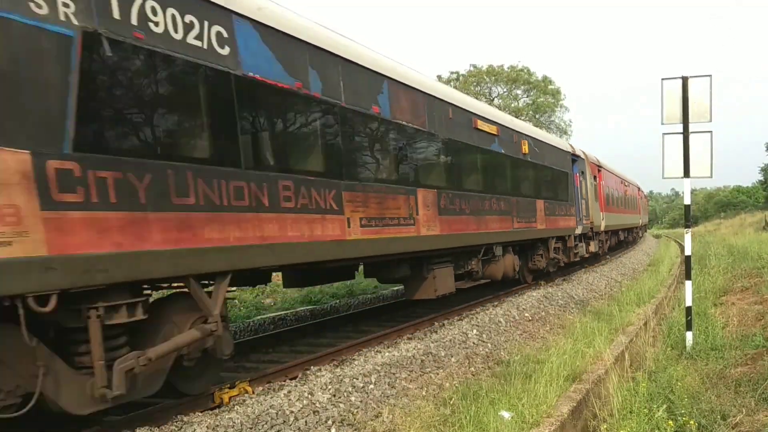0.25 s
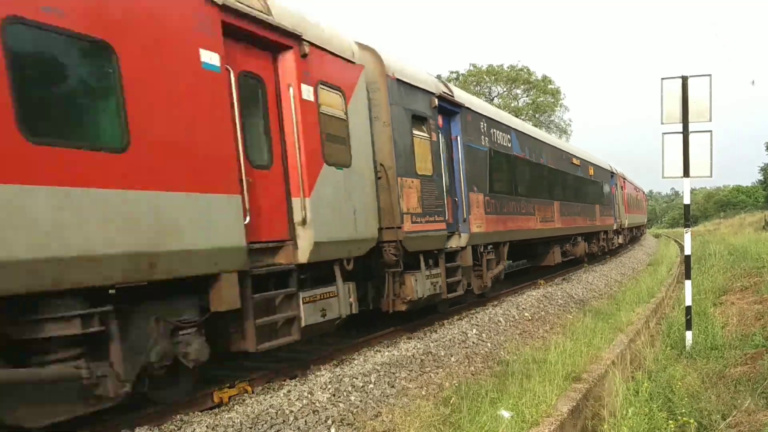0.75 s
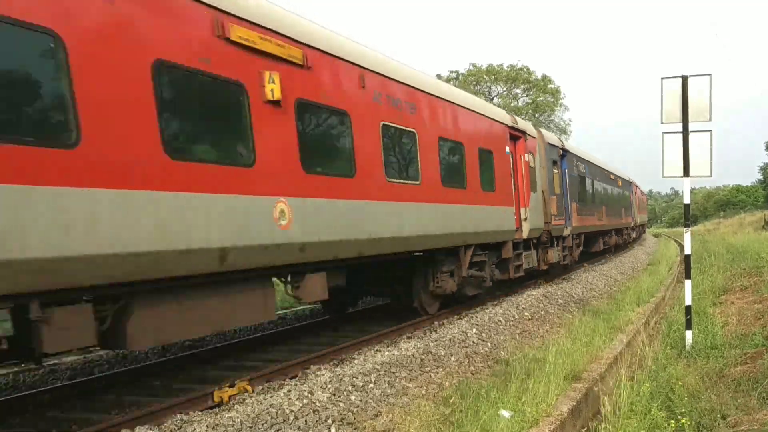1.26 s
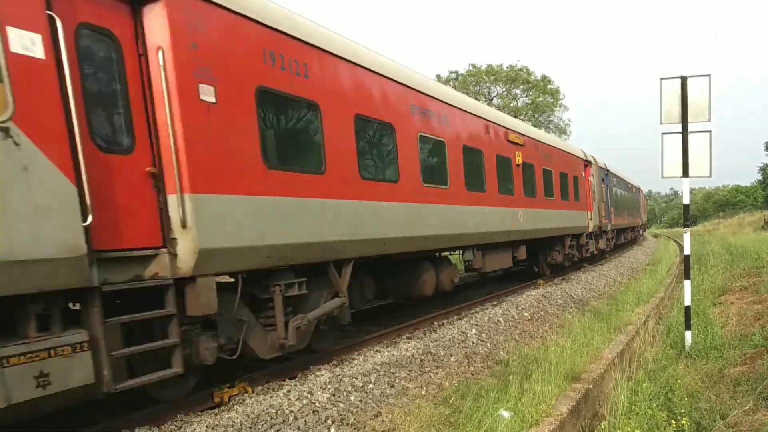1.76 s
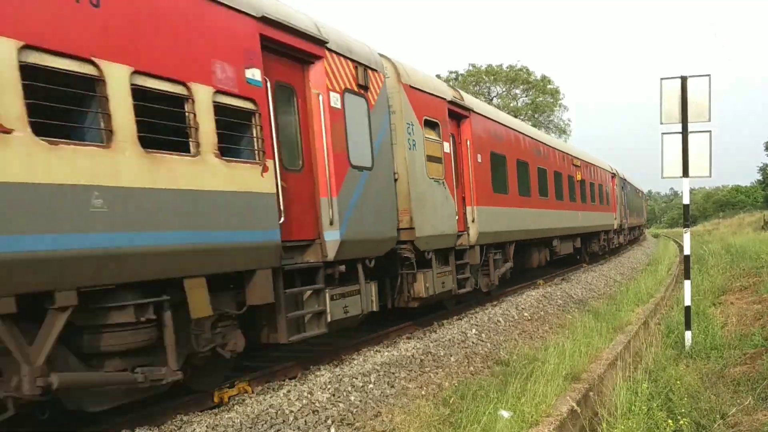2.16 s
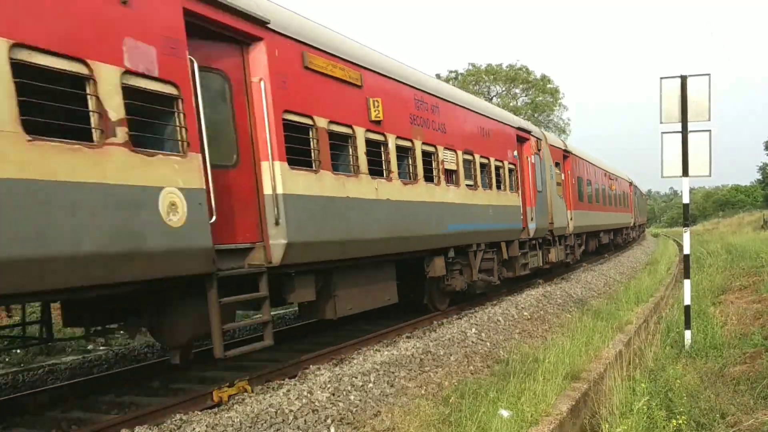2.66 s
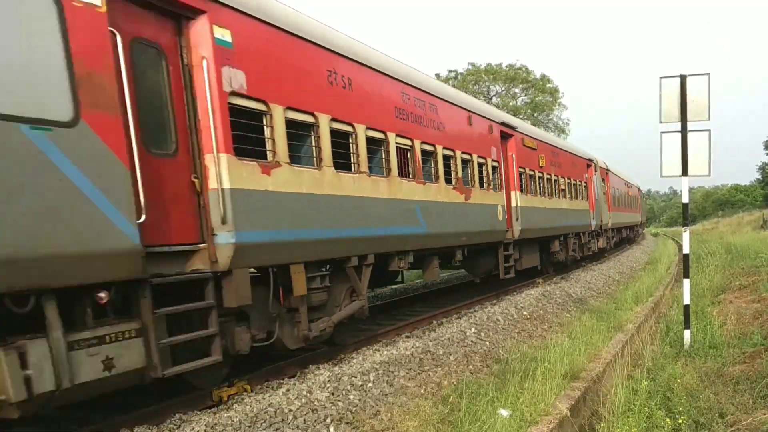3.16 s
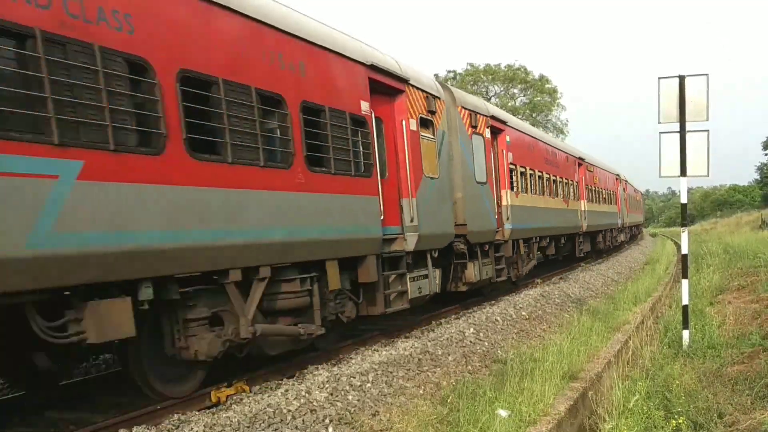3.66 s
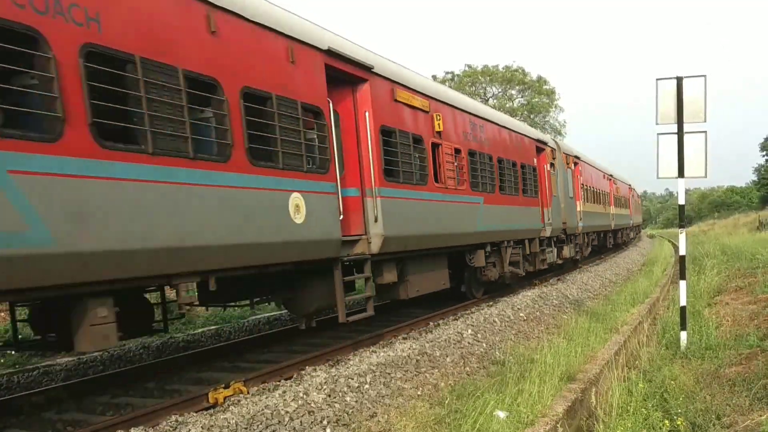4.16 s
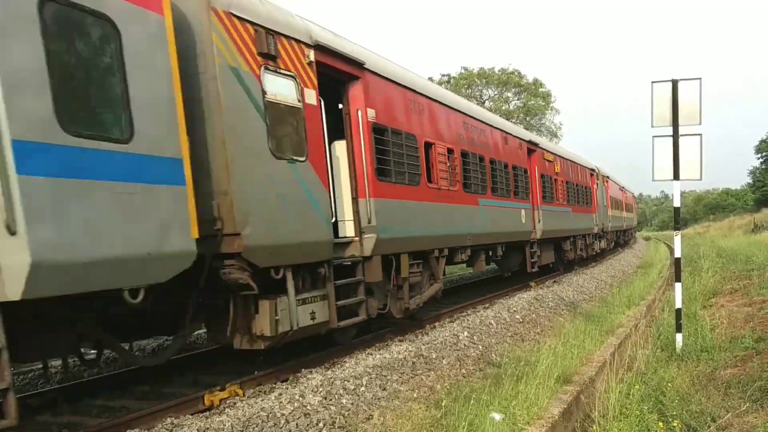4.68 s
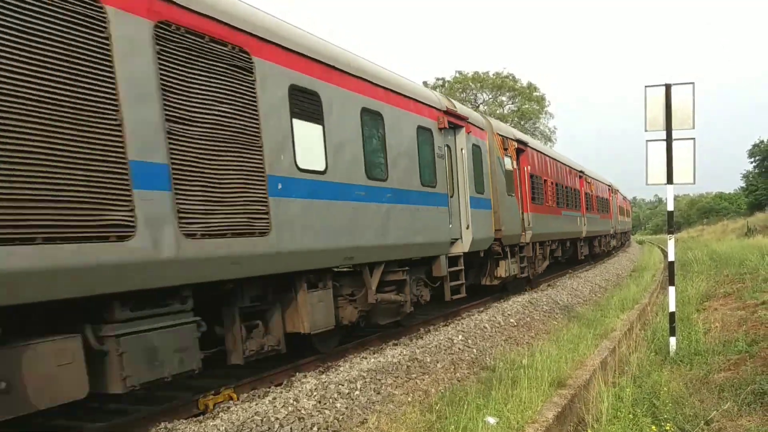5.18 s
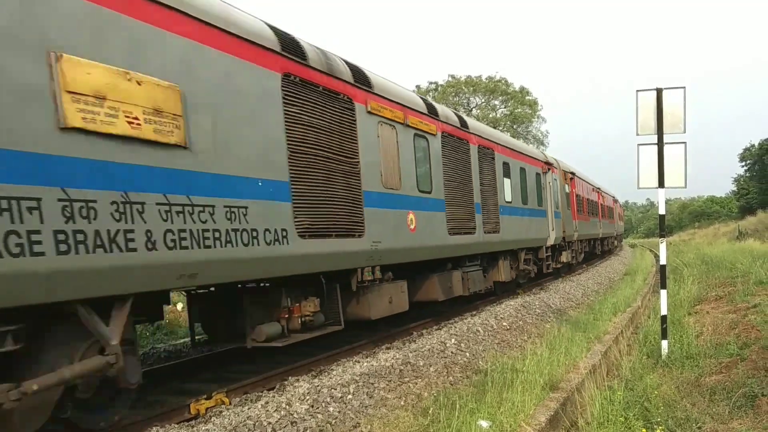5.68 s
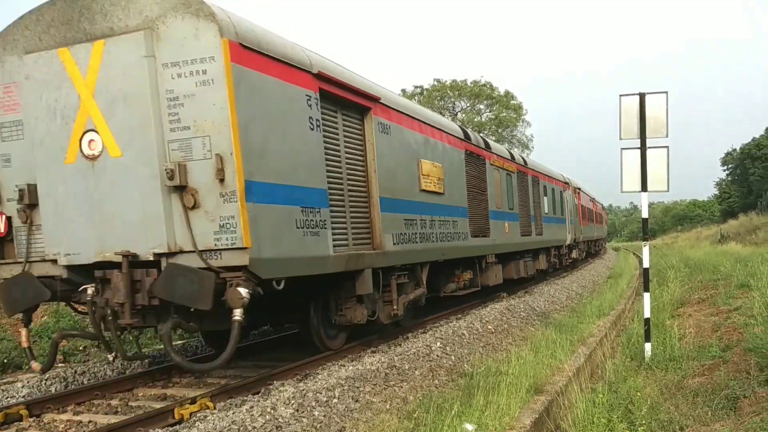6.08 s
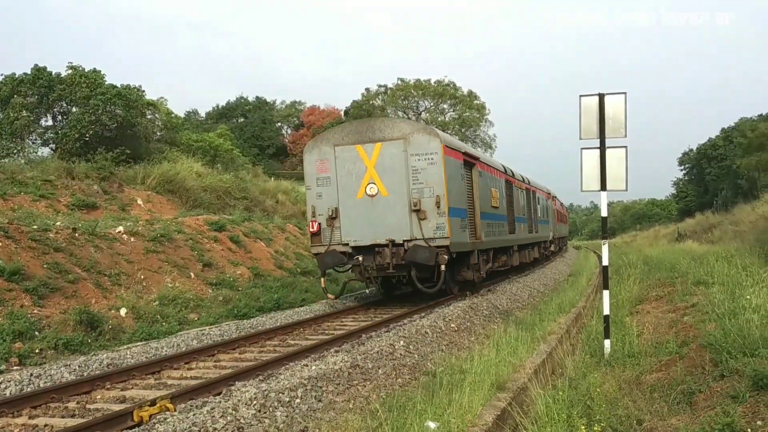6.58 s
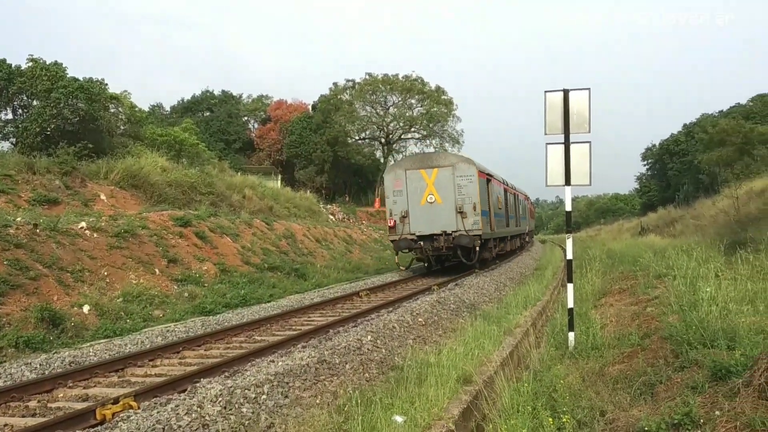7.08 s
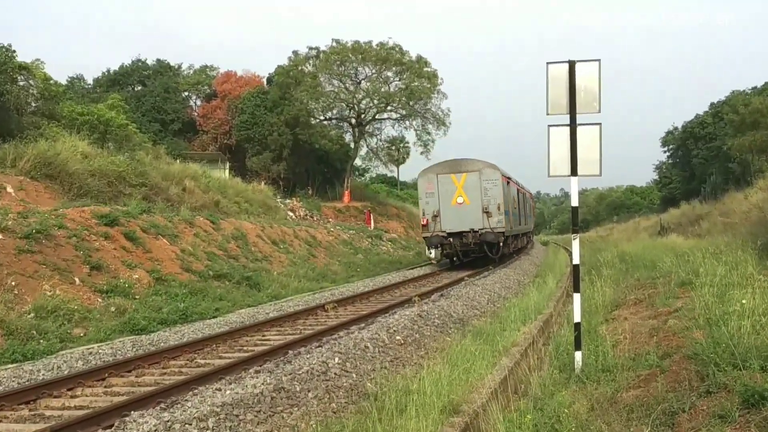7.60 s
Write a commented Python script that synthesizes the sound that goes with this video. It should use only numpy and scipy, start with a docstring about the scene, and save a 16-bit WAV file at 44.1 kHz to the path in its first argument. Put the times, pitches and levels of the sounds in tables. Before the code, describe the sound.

Outdoors, very close to a curved track, a handheld stereo microphone catches the end of a passing passenger train. From 0 s a bright, piercing wheel squeal sings over rough high grinding, hiss and low rumble. Bogies thump near 0.5 and 0.9 s. Around 1.5-2 s a harsh screech slides down in pitch as hiss surges and another bogie thuds. From 2.8 to 3.4 s thumps, sharp metallic spits and dense screeches cluster, with several wheels singing at once. Between 3.5 and 4.6 s heavy irregular thuds and rail roar swell under continuing squeal. Fierce descending screeches break out at 5.1 and 5.5 s, peaks slightly crushed. The strongest thumps and rumble come at 5.8-6 s, as the last wheels pass. Then low noise drops quickly; a softer screech lasts to 6.5 s, and thin, shrill singing and grinding hiss recede, drifting left, until nearly 8 s.

```python
"""Wheels hiss, grind and sing as the last coaches of a passenger train run past a hand-held camera on a curve.
Wheel flanges grind the rail: singing tones slide down in pitch as wheels pass, amid noise bands and screeches.
Bright spits of noise break out, and bogies thump as short bursts of low decaying tones.
Random noise shaped in pitch and time makes the rumble, rail roar and hiss underneath.
The loudest peaks overload the recorder and are cut flat."""
import sys
import numpy as np
from scipy import signal
from scipy.io import wavfile
from scipy.ndimage import uniform_filter1d

SR = 44100
rng = np.random.default_rng(int(sys.argv[2]) if len(sys.argv) > 2 else 0)


def dump(signal):
    """Clip the signal to [-1, 1] and save it as 16-bit WAV at the path in sys.argv[1]."""
    limited = np.clip(np.atleast_2d(signal).T, -1, 1)
    pcm = np.round(limited * 32767).astype(np.int16)
    wavfile.write(sys.argv[1], SR, pcm)


N = 345744  # length in samples

# Singing wheelsets: passing_s, list of modes (start_s, end_s, pitch_hz heard at the start,
# level_db before the boost and panning)
WHEEL_SQUEALS = [(.04, [(0, 0.064, 10760, -24), (0, 0.14, 9230, -17), (.055, 0.14, 5334, -3),
                 (.13, 0.22, 5320, -12), (.23, 0.35, 5220, -16.5), (.14, .33, 15700, -26)]),
                 (0.508, [(.6, .645, 5320, -11.5), (.66, .93, 9050, -36), (.95, 1.3, 8850, -32)]),
                 (1.93, [(0, .34, 10550, -22), (1.11, 1.49, 11650, -29), (1.22, 1.57, 4580, -27),
                 (1.28, 1.63, 7510, -15), (1.55, 1.66, 4575, -15), (1.72, 1.84, 4480, -13),
                 (1.88, 2.03, 4430, -14), (1.63, 1.99, 7400, -25), (1.7, 1.89, 10400, -24),
                 (1.75, 2.04, 9440, -17.5), (1.86, 2.05, 13770, -18), (2.08, 2.21, 4280, -13.5),
                 (2.1, 2.3, 9000, -19.5), (2.14, 2.41, 13100, -21), (2.3, 2.77, 8760, -36),
                 (2.24, 2.7, 4226, -23), (2.57, 2.89, 13050, -24), (2.72, 3.0, 4210, -15),
                 (3.0, 3.16, 4170, -25), (3.46, 3.79, 4180, -18)]), (2.1, [(1.72, 1.9, 14560, -17),
                 (1.74, 1.86, 4950, -31)]), (2.451, [(1.31, 1.7, 4417, -25)]),
                 (3.421, [(2.84, 3.1, 9850, -25), (3.17, 3.36, 11310, -21), (3.22, 3.4, 1786, -30),
                 (3.26, 3.42, 3650, -28), (3.24, 3.36, 2690, -33), (3.22, 3.41, 10470, -18),
                 (3.22, 3.46, 5430, -27), (3.24, 3.4, 9230, -17.5), (3.24, 3.44, 7400, -24),
                 (3.26, 3.37, 8440, -15.5), (3.26, 3.47, 4510, -20), (3.85, 5.1, 4355, -33)]),
                 (4.1, [(2.9, 3.08, 8840, -16.5), (3.6, 3.78, 9900, -35), (3.7, 3.85, 11060, -22.5),
                 (4.56, 4.98, 8250, -19), (4.63, 5.09, 12950, -20), (5.8, 6.36, 4300, -22),
                 (5.94, 6.18, 7930, -25)]), (5.49, [(4.11, 4.27, 11273, -25), (5.08, 5.22, 3720, -25),
                 (5.09, 5.21, 6755, -22.5), (5.14, 5.27, 5760, -23), (5.1, 5.33, 12000, -25),
                 (5.12, 5.36, 9080, -20), (5.49, 5.56, 9800, -19), (5.24, 5.5, 4900, -28),
                 (5.1, 5.15, 2800, -28), (5.03, 5.09, 4260, -24.5), (5.45, 5.65, 12000, -23),
                 (5.49, 5.61, 9200, -22), (5.545, 5.635, 5490, -12), (5.5, 5.76, 8100, -26),
                 (6.95, 7.2, 5240, -28.5), (7.15, 7.72, 5284, -24.5)]), (6.0, [(5.54, 5.66, 3610, -19.5)])]
# Wheels singing on as the train draws away: pitch_hz at the start, level_db before the boost and panning
RECEDING_MODES = [(6970, -35), (7374, -31), (9710, -37), (10120, -39), (10940, -39), (13880, -43),
                  (15602, -36)]
# Long grinding bands around the busiest wheel modes: start_s, end_s, first_hz, last_hz, width_hz, level_db
GRINDING_BANDS = [(0, .95, 5330, 5300, 500, -16), (.8, 1.5, 5300, 5200, 550, -21),
                  (1.1, 1.8, 7300, 7250, 600, -21), (0.64, 2.7, 9200, 8850, 650, -15.5),
                  (1.15, 2.4, 4560, 4400, 420, -15), (.45, 1.6, 4540, 4540, 400, -26),
                  (2.2, 3.4, 4360, 4350, 545, -20.5), (3.5, 5.16, 4405, 4385, 610, -20),
                  (5.1, 6.3, 4350, 4300, 470, -26), (1.5, 2.3, 13800, 18000, 1000, -20),
                  (2.2, 3.1, 13300, 13200, 1000, -17.5), (4.551, 5.7, 8250, 8250, 600, -18.5),
                  (6, 8.4, 4300, 4300, 550, -23.5), (5.2, 5.55, 4600, 7500, 400, -22.5),
                  (5.15, 5.5, 3800, 3700, 260, -25), (6.101, 6.6, 7500, 7380, 540, -16.5),
                  (6.5, 7.8, 7400, 7400, 760, -20), (6, 8.4, 5450, 5300, 710, -24),
                  (6.5, 8.4, 3450, 3450, 300, -33.5)]
# Flanges biting hard so the whole wheel rings: start_s, end_s, level_db (relative), fall_share_per_s of pitch
FLANGE_SCREECHES = [(1.517, 1.99, -15.5, 0.15), (2.842, 3.112, -21, 0.047), (3.201, 3.422, -12.5, 0.17),
                    (5.075, 5.252, -10.5, 0.092), (5.5, 5.667, -9, 0.13), (6.194, 6.5, -18.5, 0.0094)]
# Colour of the screeches: pitch_hz, level_db
SCREECH_COLOUR = [(1700, -4.5), (3500, -5), (7000, 4.5), (11000, 5.5), (15700, -1.5)]
# Bright spits: start_s, level_db (relative)
BRIGHT_SPITS = [(0.1984, -19), (2.808, -17), (2.9287, -12), (3.188, -11), (3.5827, -16), (3.9814, -18),
                (4.136, -9.5), (4.327, -14.5), (4.5364, -15), (5.08, -15), (5.464, -19), (6.582, -18)]
# Bogies over uneven rail: start_s, level_db (relative)
BOGIE_THUMPS = [(0.456, -13), (0.879, -8.5), (0.989, -8), (1.898, -8), (2.35, -10), (2.467, -16),
                (2.82, -14), (2.898, -10), (3.535, -10), (3.622, -10.5), (3.734, -9), (3.899, -13.5),
                (4.095, -6.5), (4.162, -16), (4.238, -5), (4.342, -7), (4.48, -11), (4.575, -7.5),
                (4.983, -7), (5.052, -4), (5.32, -13.5), (5.445, -16), (5.786, -3.5), (5.831, -4),
                (5.931, 1), (6.08, -11)]
# Ringing of a bogie frame: pitch_hz before detuning, level_db, time_to_fall_60_db_s
BOGIE_MODES = [(68.5, -3.5, 0.14), (224, -0.5, 0.047), (325, -4.5, 0.03), (533, -8.5, 0.073),
               (772, -9.5, 0.063)]
# Spectrum shapes of the three rolling noises, evened before use: pitch_hz, level_db (relative)
RUMBLE_SHAPE = [(12, -35), (20, -12), (70, 4.5), (128, -14.5), (216, -3), (258, -10), (353, -9),
                (448, -14.5), (700, -14.5), (910, -18.5), (1540, -120)]
ROAR_SHAPE = [(180, -30), (300, -7), (626, -5.5), (878, 3), (1250, -2.5), (2150, -3), (2500, -2),
              (3250, -25), (5500, -120)]
HISS_SHAPE = [(880, -46), (1500, -19), (2470, -9.5), (3400, -6), (3850, -6.5), (4400, -5), (4900, -8.5),
              (5500, -5), (6250, -8), (7260, -4), (8920, -4), (12000, -8.5), (14400, -10.5), (15600, -9)]
# Flange hiss over time: time_s, hiss_db, upper_hiss_db before its lift
HISS_LEVELS = [(0, -18.5, -14.5), (.5, -18, -16.5), (1.3, -15, -16.5), (1.85, -12.5, -9.5),
               (2.2, -18.5, -19), (2.801, -18, -20.5), (3.5, -17, -16), (4.2, -18.5, -14),
               (4.6, -16.5, -19), (5.05, -21, -23), (5.75, -14, -21), (6.15, -17.5, -28),
               (6.6, -18.5, -27.5), (7.84, -20.5, -30)]
# Rolling noise swelling as bogies go by: time_s, rumble_db, rail_roar_db
ROLLING_SWELLS = [(.1, -29, -33), (.48, -28.5, -30), (1.0, -24, -42), (1.62, -31, -24.5),
                  (1.881, -24.5, -25), (2.36, -32, -38), (2.841, -26.5, -43), (3.27, -34, -28),
                  (3.55, -28, -25.5), (3.74, -22.5, -33), (4.11, -25.5, -32), (4.27, -22.5, -23.5),
                  (4.52, -21.5, -22.5), (4.75, -25, -24.5), (5.0, -22, -25), (5.462, -33, -27),
                  (5.8, -22, -25), (5.89, -17.5, -21), (5.989, -18, -24), (6.11, -20, -24.5),
                  (6.56, -26, -30.5), (6.85, -33, -37), (7.58, -28.5, -36)]
# How alike the rolling noise is on both sides: pitch_hz, likeness (0 to 1)
LEFT_RIGHT_LIKENESS = [(40, 0.49), (120, 0.87), (500, 0.68), (2000, 0.53), (6000, 0.017), (15000, 0.032)]
# Balance between the sides: pitch_hz, left_over_right_db
SIDE_BALANCE = [(60, 0.5), (150, 0), (380, 0.5), (950, 3.5), (2380, 8), (5980, 1), (15000, 0.5)]
# Colour of the train heard from behind: pitch_hz, level_db
COLOUR_BEHIND = [(60, 4), (250, -5), (500, -12.5), (900, -1), (2500, -7), (9000, 3.5), (15000, 16)]
# How far the train has gone past: time_s, away_share (0 alongside to 1 gone past)
GONE_PAST = [(0, 0.079), (6.0, 0.067), (6.32, 0.74), (7.84, 0.94)]

SPEED_M_S, TRACK_M, SOUND_M_S = 16.5, 3.6, 343  # train speed, distance to the track, speed of sound
RECEDING_PASS_S, RECEDING_START_S, RECEDING_END_S = 5.49, 6.55, 8.0
SING_BOOST_DB = 3.5  # lifts all squeals
ABREAST_DB, SWING_DB = 4, 6.5  # left over right when abreast, and its swing as a wheel crosses
TURNED_DB = 10  # the camera turns after the train, which moves back to the left
GRIP_DB, GRIP_HZ = 3.5, 23.8  # depth and bandwidth of a squeal's ragged level
FADE_S, FADE_SHARE = 0.06, 0.08  # shortest fade of a squeal, and its growth as a share of the length
LAG_ALONGSIDE_MS, LAG_AWAY_MS = 0.412, 0.012  # left lags right; the second is for low sound once gone past
SWELL_S, SWELL_STEEP = 0.076, 0.95  # about half the width of a swell; how fast it falls off
BED_RUMBLE_DB, BED_ROAR_DB = -30, -34.5  # steady levels under the swells
EDGE_HZ = 15700  # upper limit of the finished sound


def wheels():
    """Grinding excites the ringing modes of passing and receding wheels, and rough bands around them."""
    out = np.zeros((2, N))
    for passing_s, modes in WHEEL_SQUEALS:
        for mode in modes:
            add(out, *squeal(passing_s, *mode))
    for mode in RECEDING_MODES:
        add(out, *squeal(RECEDING_PASS_S, RECEDING_START_S, RECEDING_END_S, *mode))
    for start, end, first_hz, last_hz, width_hz, db in GRINDING_BANDS:
        n = round((end - start) * SR)
        sides = side_gains(db, read(SIDE_BALANCE, first_hz))
        carrier = slide(np.linspace(first_hz, last_hz, n), 0.11)
        add(out, start, sides * (cluster(n, width_hz) * carrier).real)
    return out


def squeal(passing_s, start, end, first_hz, db):
    """Stick-slip holds a mode singing in a haze of noise; it falls in pitch and crosses left to right."""
    n = round((end - start + .06) * SR)  # 0.03 s extra at each end
    ahead_m = SPEED_M_S * (passing_s - start + .03 - np.arange(n) / SR)
    closing = ahead_m / np.hypot(ahead_m, TRACK_M)  # 1 coming straight at us, -1 going away
    doppler = 1 + SPEED_M_S / SOUND_M_S * closing
    hz = first_hz * doppler / doppler[round(.03 * SR)]

    # A fast slide means a near wheel, which sounds rougher; so do high modes.
    near = min((hz[0] / hz[-1] - 1) * SR / n / .15, 1)
    high = max(first_hz / 6000, 1)
    blur_hz = (30 + 70 * near) * high
    flutter = .8 * wobble(n, blur_hz, channels=1) + .6 * wobble(n, blur_hz)  # shared part, then separate sides
    tone = evened(1 + (.35 + .6 * near) * high * flutter)
    lag_s = np.array([[LAG_ALONGSIDE_MS / 1000], [0]])
    tone = tone * np.exp(-2j * np.pi * first_hz * lag_s)
    haze = gain_of(-6.5) * wobble(n, 570)

    turned_db = TURNED_DB * np.interp(start, *np.transpose(GONE_PAST))
    pan_db = read(SIDE_BALANCE, first_hz) + ABREAST_DB + SWING_DB * closing + turned_db
    sides = side_gains(db + SING_BOOST_DB, pan_db)
    grip = evened(gain_of(GRIP_DB * wobble(n, GRIP_HZ, channels=1).real))  # the flange grips and lets go
    carrier = slide(hz, FADE_S + FADE_SHARE * (end - start))
    return max(start - .03, 0), sides * grip * ((tone + haze) * carrier).real


def cluster(n, width_hz, count=7):
    """Close wheel modes spread over a band, each ringing unevenly, make a rough band with sharp edges."""
    places = (np.arange(count) + rng.uniform(.2, .8, count)) / count - .5
    turns = 2j * np.pi * width_hz * np.arange(n) / SR
    return evened(sum(wobble(n, 0.69 * width_hz / count) * np.exp(place * turns) for place in places))


def screeches():
    """A hard flange bite makes dozens of wheel modes sing roughly at once and slide down together."""
    out = np.zeros((2, N))
    draws = rng.random((len(FLANGE_SCREECHES), 35, 2))
    for (start, end, db, fall), draw in zip(FLANGE_SCREECHES, draws):
        n = round((end - start + .06) * SR)
        for k, (place, weakness) in enumerate(draw):
            hz = 1700 + 400 * (k + place)
            rasp = 1.18 * wobble(n, 62) + wobble(n, 630)  # a rough line in a wide haze
            mode_db = db - 12.5 + read(SCREECH_COLOUR, hz) - 11.0 * weakness
            sides = side_gains(mode_db, read(SIDE_BALANCE, hz))
            falling_hz = hz * (1 - fall * np.arange(n) / SR)
            add(out, start - .03, sides * (rasp * slide(falling_hz, 0.097)).real)
    return out


def spits():
    """Each spit is a puff of noise around a high pitch, with a sudden start and a brief tail."""
    out, t = np.zeros((2, N)), np.arange(9000) / SR
    fade = gain_of(-60 * t / 0.014) + gain_of(-60 * t / .5)  # quick drop plus tail
    for start, db in BRIGHT_SPITS:
        puff = (wobble(len(t), 760, step=2) * np.exp(2j * np.pi * 11200 * t)).real
        add(out, start, gain_of(db + 2.0) * fade * puff)
    return out


def bogies():
    """Each blow rings the modes of the bogie frame, detuned from blow to blow and from side to side."""
    out, t = np.zeros((2, N)), np.arange(5000) / SR
    tunings = rng.uniform(0.96, 1.103, (len(BOGIE_THUMPS), len(BOGIE_MODES), 2, 1))
    for (start, db), tuning in zip(BOGIE_THUMPS, tunings):
        tuning = .2 * tuning[:, :1] + .8 * tuning  # the sides share a little of their tuning
        ring = 0
        for (hz, mode_db, fall_s), factor in zip(BOGIE_MODES, tuning):
            ring = ring + gain_of(mode_db - 60 * t / fall_s) * np.sin(2 * np.pi * hz * factor * t)
        attack = np.minimum(t / 0.0023, 1)
        add(out, start, gain_of(db - 5.5) * ring * attack)
    return out


def rolling():
    """Rolling contact rumbles, roars and hisses: random short-time spectra, patchy, heard by two ports."""
    frames, bins_hz = N // 256 + 5, np.fft.rfftfreq(1024, 1 / SR)
    hz = bins_hz[:, None]
    t = np.arange(frames) * 256 / SR

    # Levels over time
    hiss_s, hiss_points, upper_points = np.transpose(HISS_LEVELS)
    hiss_db = np.interp(t, hiss_s, hiss_points)
    upper_db = np.interp(t, hiss_s, upper_points)
    swell_s, rumble_db, roar_db = np.transpose(ROLLING_SWELLS)
    swell = (1 + ((t[:, None] - swell_s) / SWELL_S) ** 2) ** -SWELL_STEEP
    rumble_gain = np.hypot(gain_of(BED_RUMBLE_DB), np.linalg.norm(swell * gain_of(rumble_db), axis=1))
    roar_gain = np.hypot(gain_of(BED_ROAR_DB), np.linalg.norm(swell * gain_of(roar_db), axis=1))

    # Random texture: axis 0 is pitch, axis 1 is time
    a, b, c, d, patches, streaks = rng.standard_normal((frames, 513, 6)).T
    patches = evened(uniform_filter1d(uniform_filter1d(patches, 20, 0), 14, 1))
    # Narrow random streaks in the hiss, each lasting briefly
    streaks = evened(uniform_filter1d(uniform_filter1d(streaks, 2, 0), 18, 1))
    # Random unevenness over time, shared by rumble and roar
    unevenness = evened(uniform_filter1d(rng.standard_normal(frames), 6))

    # Add the powers of the three noises
    shapes = [gain_of(read(table, bins_hz))[:, None] for table in (RUMBLE_SHAPE, ROAR_SHAPE, HISS_SHAPE)]
    rumble, roar, hiss = (shape / np.linalg.norm(shape) for shape in shapes)
    upper = 1 / (1 + (9500 / (hz + 1)) ** 16)  # share of the upper hiss
    streak_db = 5.62 * np.clip(hz / 5000, .5, 1) * streaks
    hiss_gain = gain_of(hiss_db + upper * (upper_db - hiss_db + 3.0) + streak_db)
    power = (rumble * rumble_gain * gain_of(1.5 * unevenness)) ** 2
    power = power + (roar * roar_gain * gain_of(2.2 * unevenness)) ** 2
    power = power + (hiss * hiss_gain) ** 2

    # Left is partly like right, and lags it
    away = np.interp(t, *np.transpose(GONE_PAST))
    lag_s = (LAG_ALONGSIDE_MS + (hz < 2500) * away * (LAG_AWAY_MS - LAG_ALONGSIDE_MS)) / 1000
    lag_s = lag_s * (1 - 0.66 * np.exp(-(hz / 1100) ** 2))  # long waves wrap round the camera body
    same = np.clip(read(LEFT_RIGHT_LIKENESS, bins_hz), -1, 1)[:, None]
    right = a + 1j * b
    left = same * right + np.sqrt(1 - same ** 2) * (c + 1j * d)
    left = left * np.exp(-2j * np.pi * hz * lag_s)

    tilt = gain_of(read(SIDE_BALANCE, bins_hz) / 2)[:, None]
    colour = gain_of(1.29 * patches + read(COLOUR_BEHIND, bins_hz)[:, None] * away)
    spectra = np.array([left * tilt, right / tilt]) * np.sqrt(power) * colour
    return gain_of(0.5) * signal.istft(spectra, nperseg=1024, noverlap=768)[1][:, :N]


def wobble(n, width_hz, step=16, channels=2):
    """Complex noise around zero pitch with steep skirts, drawn coarsely and joined by straight lines."""
    coarse = n // step + 2
    shape = (channels, coarse + 200)  # the first 200 let the filter settle
    z = rng.standard_normal(shape) + 1j * rng.standard_normal(shape)
    r = np.exp(-np.pi * width_hz * step / SR)
    z = evened(signal.lfilter([1], [1, -2 * r, r * r], z)[:, 200:])
    at, share = np.divmod(np.arange(n), step)
    return z[:, at] + (z[:, at + 1] - z[:, at]) * (share / step)


def slide(hz, fade_s):
    """A rotating phase that follows a sliding pitch, faded in and out."""
    fade = signal.windows.tukey(len(hz), min(2 * fade_s * SR / len(hz), 1))
    return fade * np.exp(2j * np.pi * np.cumsum(hz) / SR)


def side_gains(db, left_over_right_db):
    """Left and right gains that share a level difference equally."""
    return gain_of(db + left_over_right_db * np.array([[.5], [-.5]]))


def gain_of(db):
    """Turn decibels into an amplitude factor."""
    return 10 ** (np.asarray(db) / 20)


def evened(x):
    """Scale to an average (RMS) strength of one."""
    return x / np.sqrt(np.mean(abs(x) ** 2) + 1e-20)


def read(points, hz):
    """Read a table between its points, along a logarithmic pitch scale."""
    f, value = np.transpose(points)
    return np.interp(np.log(hz + 1), np.log(f + 1), value)


def add(mix, start_s, sound):
    """Lay a sound into the mix at its start time, cut at the end of the mix."""
    part = mix[:, round(start_s * SR):][:, :sound.shape[1]]
    part += sound[:, :part.shape[1]]


def scene():
    """Sum the rolling noise, wheels, screeches, bogies and spits."""
    return rolling() + wheels() + screeches() + bogies() + spits()


def record(dry):
    """The recorder's converter cuts the peaks flat, then a filter removes the highest treble."""
    clipped = np.clip(dry, -.97, .97)
    low_pass = signal.firwin(1023, EDGE_HZ, window=("kaiser", 7), fs=SR)
    return signal.oaconvolve(clipped, low_pass[None], "same")


dry = scene()
out = record(dry)
dump(out)
```